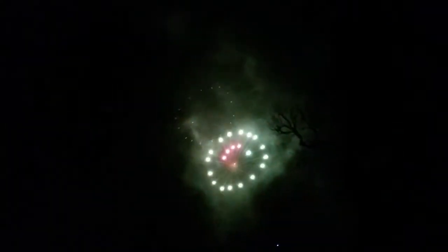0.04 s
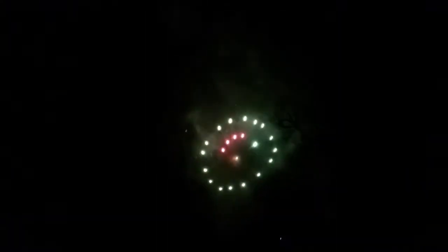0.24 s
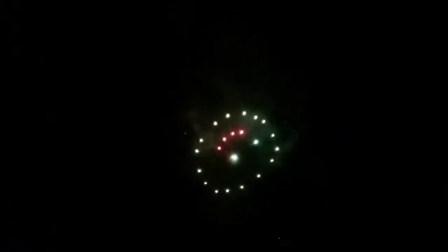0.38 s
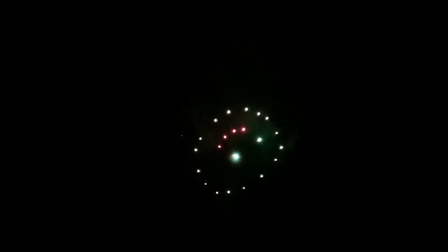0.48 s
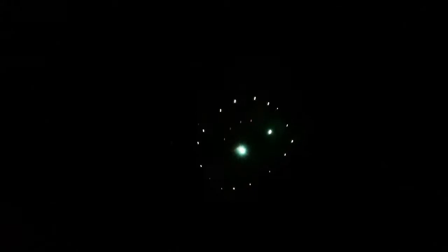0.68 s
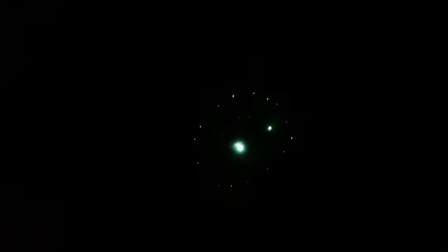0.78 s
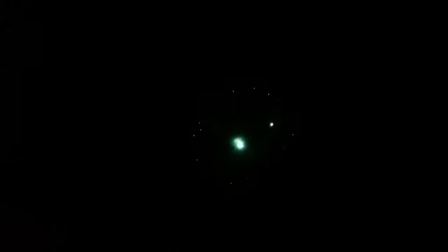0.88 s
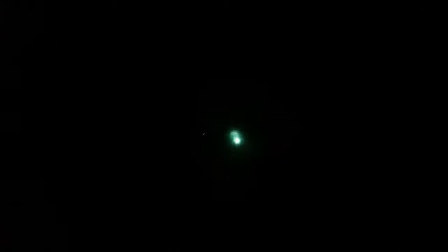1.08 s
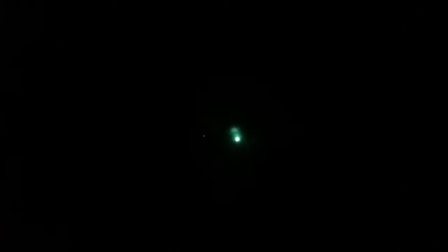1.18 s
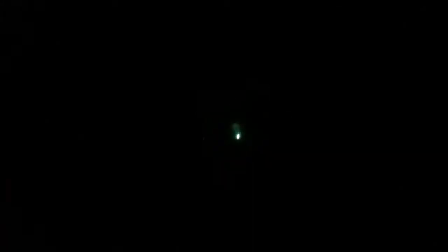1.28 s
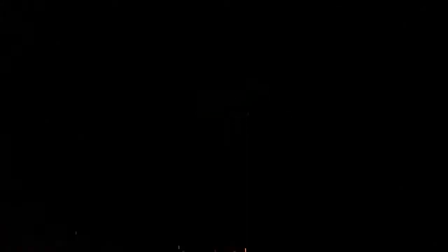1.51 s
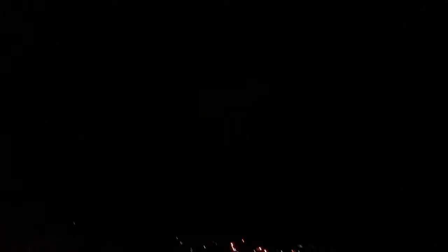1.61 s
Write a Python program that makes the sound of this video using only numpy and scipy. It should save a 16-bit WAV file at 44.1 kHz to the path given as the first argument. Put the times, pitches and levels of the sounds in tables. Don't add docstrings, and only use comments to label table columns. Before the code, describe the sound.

A single firework bang bursts at night, overloading a small microphone with quick slapback echoes, then rolls away as a dulling valley rumble; a far hillside answers late and two faint bangs follow.

```python
import sys
import numpy as np
from scipy import signal
from scipy.io import wavfile

SR = 44100
rng = np.random.default_rng(int(sys.argv[2]) if len(sys.argv) > 2 else 0)


def wav_out(sig):
    wavfile.write(sys.argv[1], SR, np.round(np.clip(np.atleast_2d(sig).T, -1, 1) * 32767).astype(np.int16))


def invert_db(x):
    u = np.asarray(x, float) / 20
    return 10 ** u


N = 72765

# start_s [s], boom_db [dB], push_ms [ms], rise_ms [ms], crack_db [dB]
BLAST_FRONTS = [(0.2025, 7, -2.0, .4, 7), (0.2078, -1, .4, .1, -30), (0.2083, 10, -2.7, .4, -22),
                (0.2119, 0, -1.8, .5, -24), (0.2832, 3, -2.3, .6, 9), (0.2868, 6, -3.2, .8, -24),
                (0.2569, 2, .75, .15, -4), (0.2589, -6, .5, .15, -14), (0.2615, 0, -1.7, .5, -18),
                (0.2371, -1, -1.5, .5, -22), (0.2970, -5, -2.0, .8, -30), (0.3068, -3, -2.1, .8, -26),
                (0.3179, -9, .6, .3, -26), (0.3203, -3, -2.0, .5, -24), (0.3734, -22, -1.2, .3, -9),
                (0.4480, -15, -1.9, .8, -45), (0.6520, -27, 2.5, .9, -60), (0.9650, -30, -.9, .3, -60)]
# start_s [s], level_db [dB], t60_s [s]
HEDGE_SPRAY = (.2572, -26, 0.06)
# time_s [s], level_db [dB]
VALLEY_LEVEL = [(.203, -12.5), (.215, -15.5), (.25, -21), (.32, -19.5), (.36, -25.5), (.42, -30),
                (.55, -34.5), (.59, -38), (.65, -38), (.74, -44.5), (1.0, -53), (1.3, -69)]
# pitch_hz [Hz], level_db [dB per Hz]
VALLEY_COLOUR = [(35, -9.5), (90, -4.5), (230, 1), (420, -8.5), (600, -10), (1500, -17), (4000, -30.5),
                 (9000, -42.5), (16000, -43.5)]
# time_s [s], level_db [dB]
HILL_LEVEL = [(.6, -61), (.74, -47.5), (.82, -40), (.94, -41), (.98, -38.5), (1.08, -40.5), (1.2, -43),
              (1.4, -44.5), (1.5, -43.5), (1.65, -42.5)]
# pitch_hz [Hz], level_db [dB per Hz]
HILLSIDE_COLOUR = [(35, -22), (100, -11.5), (225, 0.5), (390, -10), (620, -9), (900, -16), (3000, -26),
                   (12000, -72)]
# start_s [s], level_db [dB], t60_s [s]
DISTANT_BANGS = [
    (1.561, -46.5, 0.28),
    (1.617, -47, 0.13),
]
# pitch_hz [Hz], level_db [dB per Hz]
TRAFFIC_COLOUR = [(35, -5), (90, 10), (200, -12.5), (650, -8.5), (1050, -5.5), (2300, -24), (4500, -49),
                  (16000, -68)]

BURST_S, HILL_S = .2025, .71
BLAST_DECAY, CRACK_LOW_HZ, CRACK_HIGH_HZ = .27, 1800, 6830
AIR_DB_PER_S, HILL_AIR_DB_PER_S, AIR_POWER = 16, 58, 1.5
BASS_DB_PER_S = -6
ECHOES_PER_S, ECHO_SPREAD_DB, PATCHY_DB = 2500, 3, 1.5
TRAFFIC_DB = -50.5
DUCK_DB, DUCK_AHEAD_S, DUCK_RELEASE_S = -20, .03, 2.2
MIC_LOW_HZ, MIC_LOW_Q, RUMBLE_CUT_HZ = 90, .75, 55
UPPER_HZ, UPPER_WIDTH_HZ, UPPER_DB = 12200, 920, 3
PORT_HZ, PORT_Q = 6175, 6.53
HISS_DB = -77
OVERLOAD_TOP, OVERLOAD_HARDNESS = .88, 8
BAND_LIMIT_HZ = 17000


def blasts():
    t = np.arange(N) / SR
    boom, crack = np.zeros(N), np.zeros(N)
    for start_s, boom_db, push_ms, rise_ms, crack_db in BLAST_FRONTS:
        ms = np.maximum(t - start_s, 0) * 1000
        u = ms / abs(push_ms)
        rise = 1 - np.exp(-ms / abs(rise_ms))
        push = (1 - u) * np.exp(-BLAST_DECAY * u * u)
        boom += np.sign(push_ms) * invert_db(boom_db) * rise * push
        crack[int(start_s * SR)] -= np.sign(push_ms) * invert_db(crack_db)
    start_s, level_db, t60_s = HEDGE_SPRAY
    fade = invert_db(level_db - 60 * np.maximum(t - start_s, 0) / t60_s)
    crack += rng.standard_normal(N) * (t >= start_s) * fade
    crack_band = signal.butter(2, [CRACK_LOW_HZ, CRACK_HIGH_HZ], "band", fs=SR, output="sos")
    return boom + signal.sosfilt(crack_band, crack)


def valley():
    age = np.maximum(np.arange(N) / SR - BURST_S, 0)

    def loss(hz):
        return age * (AIR_DB_PER_S * (hz / 6000) ** AIR_POWER + BASS_DB_PER_S * (hz < 150))

    return (age > 0) * invert_db(in_time(VALLEY_LEVEL)) * coloured(echoes(), VALLEY_COLOUR, loss)


def hillside():
    age = np.maximum(np.arange(N) / SR - HILL_S, 0)

    def loss(hz):
        return age * HILL_AIR_DB_PER_S * (hz / 6000) ** AIR_POWER

    return invert_db(in_time(HILL_LEVEL)) * coloured(echoes(), HILLSIDE_COLOUR, loss)


def echoes():
    spread = np.minimum(rng.exponential(1, (2, N)), 5)
    sizes = invert_db(ECHO_SPREAD_DB * spread) * rng.choice([-1, 1], (2, N))
    clicks = sizes * (rng.random((2, N)) < ECHOES_PER_S / SR)
    return clicks + .3 * rng.standard_normal((2, N))


def far_bangs():
    t = np.arange(N) / SR
    shape = np.zeros(N)
    for start_s, level_db, t60_s in DISTANT_BANGS:
        shape += invert_db(level_db - 60 * np.maximum(t - start_s, 0) / t60_s) * (t >= start_s)
    body = signal.butter(1, [400, 850], "band", fs=SR, output="sos")
    dull = signal.butter(4, 2600, fs=SR, output="sos")
    colour = np.vstack([body, dull])
    grains = echoes()[0]
    return signal.sosfilt(colour, shape * grains) / signal.sosfilt(colour, grains).std()


def traffic():
    return invert_db(TRAFFIC_DB) * coloured(rng.standard_normal((2, N)), TRAFFIC_COLOUR, lambda hz: 0)


def coloured(source, spectrum, loss):
    out, plain = 0, 0
    edges = 30 * 2 ** np.arange(0, 9.6, .5)
    pitch_hz, level_db = np.transpose(spectrum)
    for k, (low, high) in enumerate(zip(edges, np.minimum(edges[1:], .45 * SR))):
        band_pass = signal.butter(2, [low, high], "band", fs=SR, output="sos")
        band = signal.sosfilt(band_pass, source[k % len(source)])
        hz = np.sqrt(low * high)
        band = band * invert_db(np.interp(np.log(hz), np.log(pitch_hz), level_db))
        plain = plain + band
        out = out + band * invert_db(PATCHY_DB * drift(37.7) - loss(hz))
    return out / plain.std()


def drift(rate):
    r = np.exp(-80 * np.pi * rate / SR)
    slow = signal.lfilter([1], [1, -2 * r, r * r], rng.standard_normal(N // 40 + 2002))
    slow = slow[2000:]
    return np.interp(np.arange(N) / 40, np.arange(len(slow)), slow / slow.std())


def in_time(rows):
    time_s, level_db = np.transpose(rows)
    return np.interp(np.arange(N) / SR, time_s, level_db)


def duck():
    t = np.arange(N) / SR - BURST_S
    pull = np.clip(1 + t / DUCK_AHEAD_S, 0, 1)
    recovery = np.exp(-np.maximum(t, 0) / DUCK_RELEASE_S)
    return invert_db(DUCK_DB * pull * recovery)


def scene():
    blast = blasts() + valley() + hillside()
    return (blast + far_bangs() + duck() * traffic())[None]


def resonance(x, hz, width_hz):
    r = np.exp(-np.pi * width_hz / SR)
    poles = [1, -2 * r * np.cos(2 * np.pi * hz / SR), r * r]
    return signal.lfilter((1 - r * r) / 2 * np.array([1, 0, -1]), poles, x)


def top_cut(x):
    return signal.sosfilt(signal.butter(12, 16850, fs=SR, output="sos"), x)


def record(dry):
    w = 2 * np.pi * MIC_LOW_HZ
    bass_cut = signal.bilinear([1, 0, 0], [1, w / MIC_LOW_Q, w * w], SR)
    x = signal.lfilter(*bass_cut, dry)
    x = signal.sosfilt(signal.butter(2, RUMBLE_CUT_HZ, "high", fs=SR, output="sos"), x)
    x = x + invert_db(UPPER_DB) * resonance(x, UPPER_HZ, UPPER_WIDTH_HZ)
    r = np.exp(-np.pi * PORT_HZ / PORT_Q / SR)
    port = [1, -2 * r * np.cos(2 * np.pi * PORT_HZ / SR), r * r]
    x = signal.lfilter([sum(port)], port, x)
    x = x + invert_db(HISS_DB) * duck() * rng.standard_normal(x.shape)
    x = x / (1 + np.abs(x / OVERLOAD_TOP) ** OVERLOAD_HARDNESS) ** (1 / OVERLOAD_HARDNESS)
    x = signal.sosfilt(signal.cheby2(10, 60, BAND_LIMIT_HZ, fs=SR, output="sos"), x)
    return top_cut(x)


dry = scene()
out = record(dry)
wav_out(out)
```